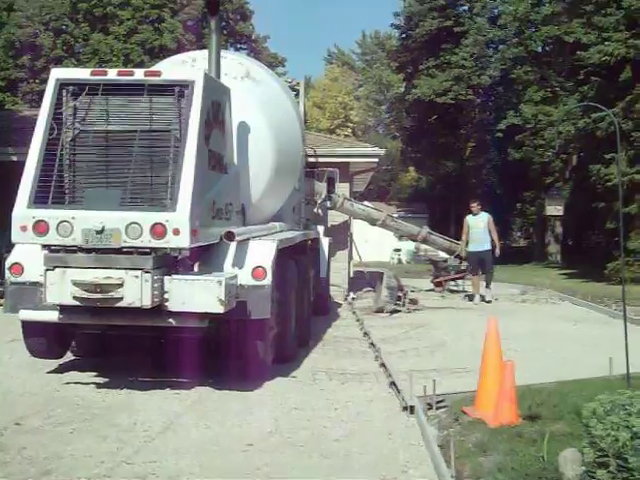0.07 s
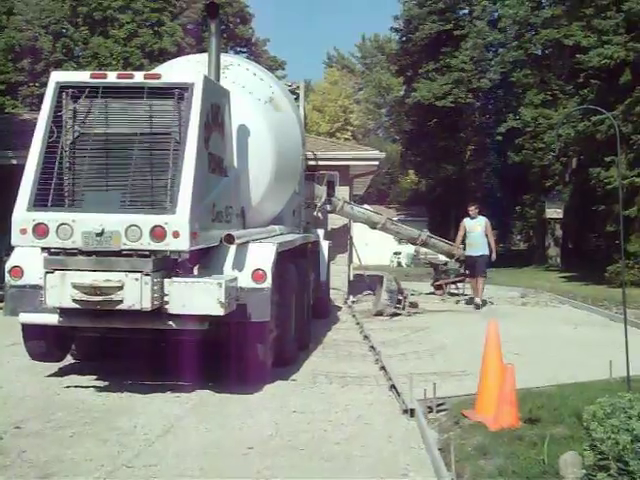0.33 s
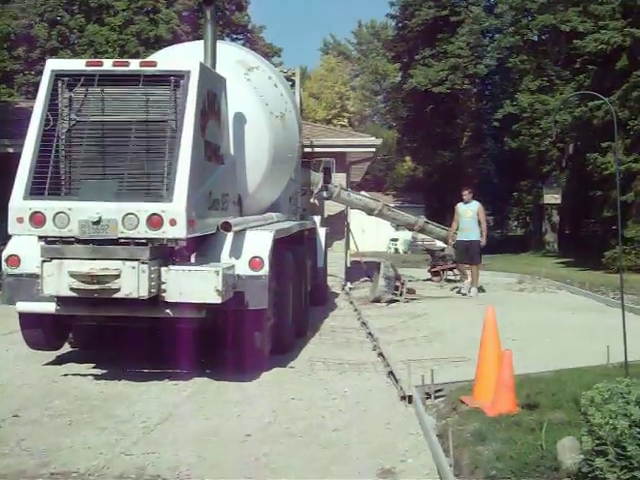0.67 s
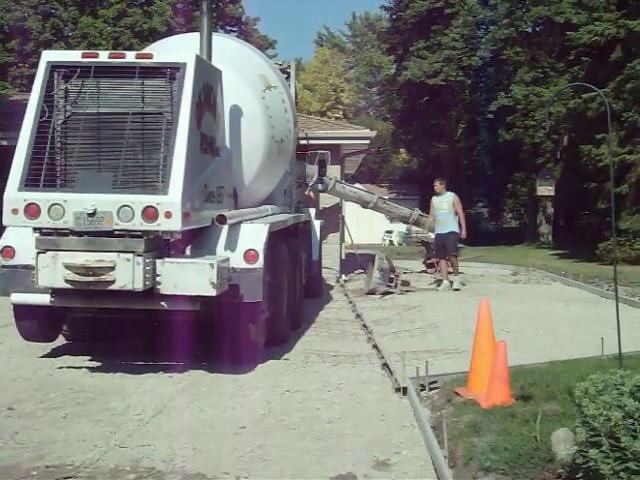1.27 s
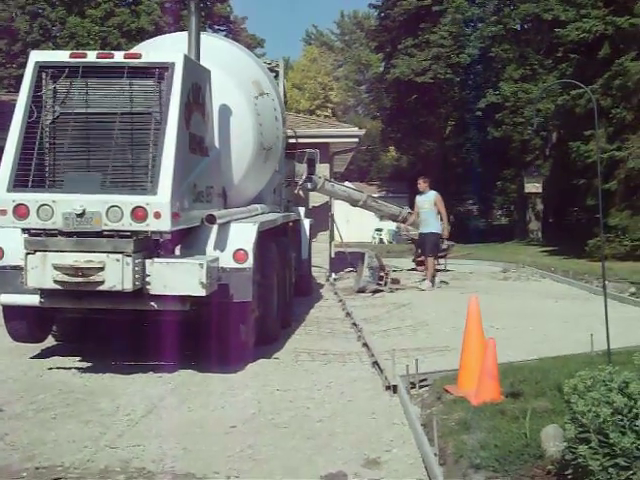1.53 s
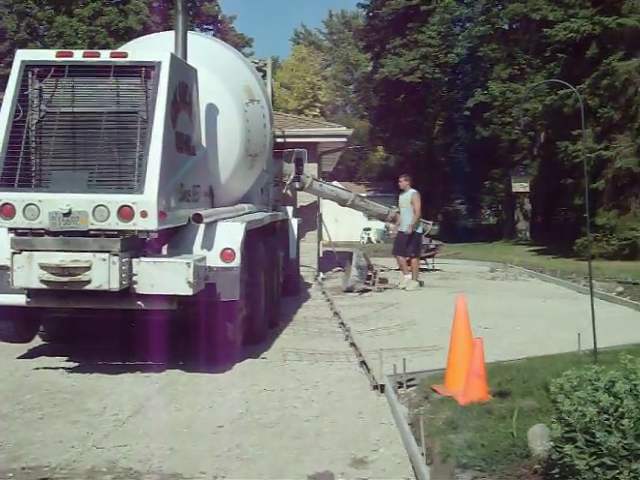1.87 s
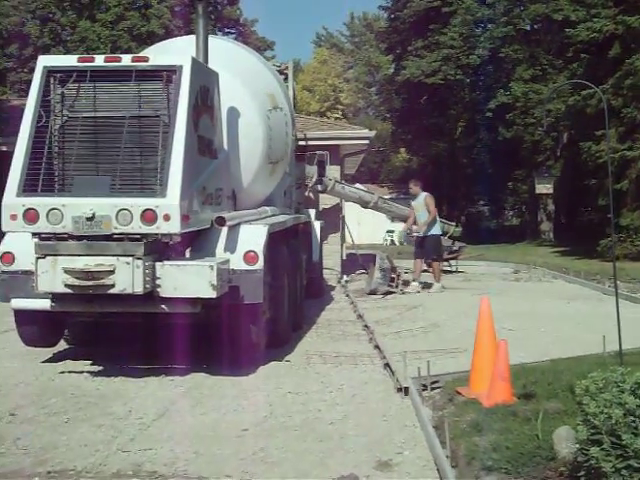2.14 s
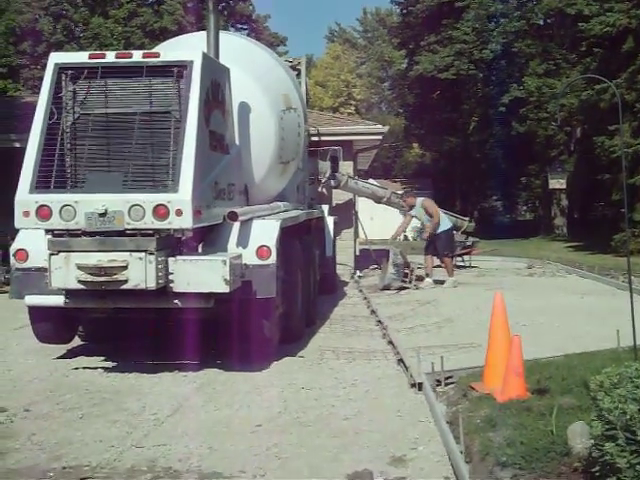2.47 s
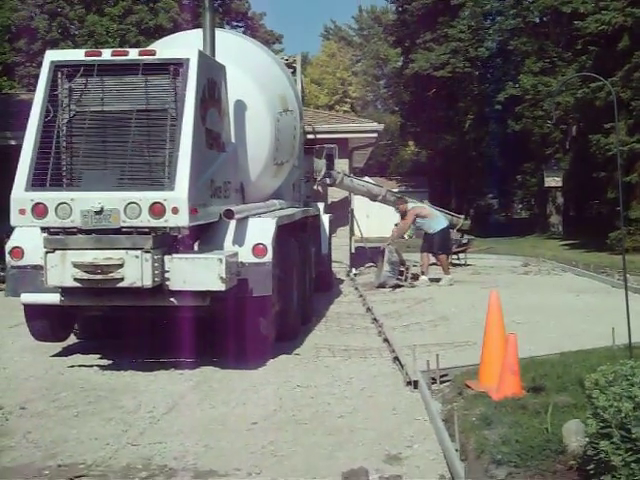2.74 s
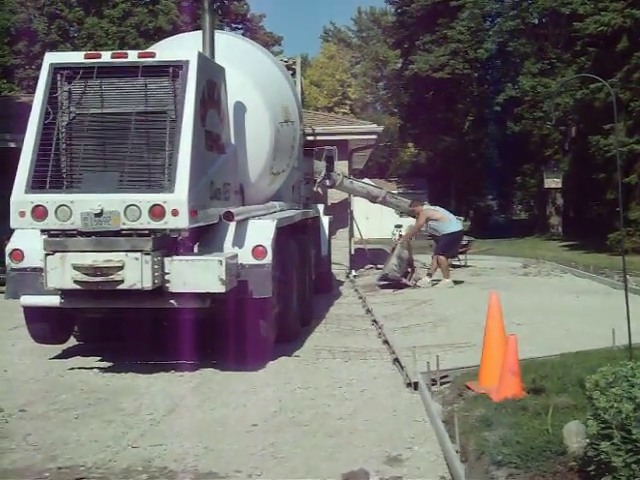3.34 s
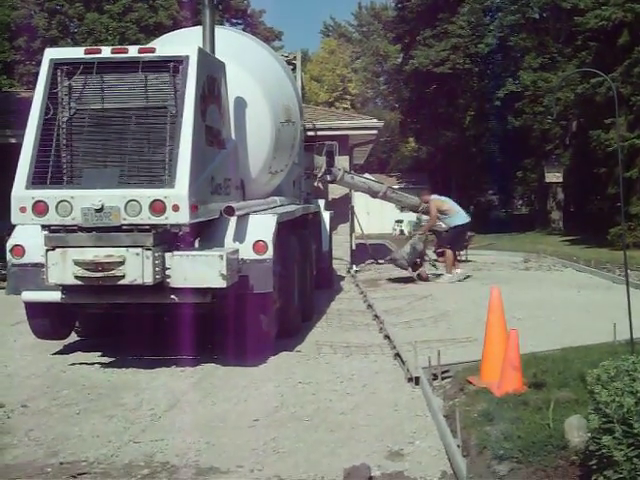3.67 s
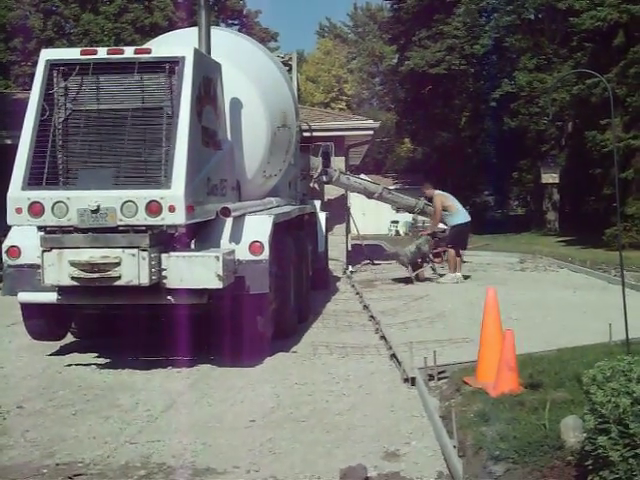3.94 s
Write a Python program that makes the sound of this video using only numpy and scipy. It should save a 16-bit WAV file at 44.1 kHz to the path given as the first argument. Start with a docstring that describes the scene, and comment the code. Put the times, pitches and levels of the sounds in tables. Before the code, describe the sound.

A concrete mixer truck's diesel engine starts at a high rev with a fan roar and raspy hiss, then slows steadily. A thin, fluttering whistle rises in pitch, strongest from about 1.7 to 2.9 seconds, then faint. The hiss fades as the firings separate. From about 3 seconds to the end at 4, the engine idles with hard knocking, ticking and exhaust thumps. Gears and drum grind underneath throughout.

```python
"""A concrete mixer truck's six-cylinder diesel runs down from a high rev into a knocking idle.
Each firing thumps the exhaust and rings the block, with injectors and valves ticking just ahead.
Behind it the gears and drum grind, the fan's roar eases and the turbocharger spins down.
Coarse sampling folds the turbo's falling whistle over, so it is heard rising for about three seconds."""
import sys
import numpy as np
from scipy import signal
from scipy.fft import rfft, irfft, next_fast_len
from scipy.io import wavfile
from scipy.ndimage import map_coordinates

SR = 44100
rng = np.random.default_rng(int(sys.argv[2]) if len(sys.argv) > 2 else 0)


def pcm_store(signal):
    """Save signal as 16-bit PCM."""
    levels = np.round(np.clip(np.atleast_2d(signal), -1, 1) * 32767)
    wavfile.write(sys.argv[1], SR, levels.astype(np.int16).T)


N = 176400


def amp(db):
    """Decibels to gain."""
    return 10 ** (np.asarray(db) / 20)


def unit(x):
    """Scale to rms 1."""
    return x / np.sqrt(np.mean(x ** 2) + 1e-20)


def curves(rows):
    """One automation curve for each column after the time."""
    seconds, *columns = np.transpose(rows)
    return [np.interp(np.arange(N) / SR, seconds, column) for column in columns]


def wobble(rate):
    """A smooth random curve, rate knots a second."""
    return map_coordinates(rng.standard_normal(2000), [np.arange(N) * rate / SR + 2], mode="wrap")


def filtered(x, response):
    """Apply a complex frequency response."""
    size = next_fast_len(N + SR // 2)
    return irfft(rfft(x, size) * response(np.fft.rfftfreq(size, 1 / SR)), size)[:N]


def equalised(x, eq):
    """Apply an EQ drawn through (Hz, dB) points on a log axis."""
    hz, db = np.transpose(eq)
    return filtered(x, lambda f: amp(np.interp(np.log(f + 1), np.log(hz + 1), db)))


def noise(eq):
    """Noise at rms 1, coloured by an EQ."""
    return unit(equalised(rng.standard_normal(N), eq))


def ringing(x, modes):
    """Ring a bank of resonances of alternating polarity."""
    return filtered(x, lambda f: sum(
        (-1) ** k * amp(db) * 1j * f * width / (hz * hz - f * f + 1j * f * width)
        for k, (hz, width, db) in enumerate(modes)))


def bursts(pulses, attack_s, decay_s):
    """A short swell and decay after every pulse."""
    t = np.arange(SR // 8) / SR
    envelope = (1 - np.exp(-t / attack_s)) * np.exp(-t / decay_s)
    return signal.fftconvolve(pulses, envelope)[:N]


# Sub-bass of the chassis. Each row: frequency in Hz, gain in dB.
RUMBLE_EQ = [(5, -0.5), (15, -2), (28, -1), (45, -14), (90, -38.5)]

def chassis_rumble():
    """The chassis shudders, faint and deep."""
    return amp(-46.5) * noise(RUMBLE_EQ)


# Tone of the air bed and of the fan's roar. Each row: frequency in Hz, gain in dB.
AIR_EQ = [(15, -11), (40, 3.5), (150, 4.5), (350, 4.5), (1000, -0.5), (1400, 2), (2100, -11.5),
          (3200, -5.5), (4200, -2.5), (5100, -0.5), (6000, -29), (8000, -33)]
ROAR_EQ = [(20, -29), (60, -20), (130, -5.5), (260, -6), (400, 1), (500, -3), (575, -6.5), (680, 4.5),
           (980, 0.5), (1130, -1.5), (1260, -14.5), (1450, -19), (1800, -11.5), (2100, -20), (2500, -11.5),
           (3100, -15), (3800, -18.5), (5000, -20.5), (6000, -27.5), (8000, -45.5)]
# Fader for the roar. Each row: time in seconds, level in dB.
ROAR_LEVEL = [(0, -9), (.2, -14.5), (.7, -14), (.85, -18), (1.3, -19), (1.7, -23), (2.2, -20.5), (2.7, -22),
              (3.1, -15), (3.5, -18), (4, -16)]

def fan_roar():
    """Turbulent air from the fan and intake, over a steady rush."""
    level_db, = curves(ROAR_LEVEL)
    roar = amp(level_db + 0.77 * wobble(24.99) + 0.88 * wobble(130)) * noise(ROAR_EQ)
    rush = amp(-27.5 + 1.1 * wobble(20)) * noise(AIR_EQ)
    return roar + rush


# Tone of the blade rasp. Each row: frequency in Hz, gain in dB.
RASP_EQ = [(900, -35.5), (1550, -13), (1900, -3), (2500, 3), (3000, 2.5), (3500, -2.5), (4200, -10),
           (5000, -10), (6000, -12), (8000, -39.5)]
# Fader for the rasp. Each row: time in seconds, level in dB.
RASP_LEVEL = [(0, -24.5), (.7, -24), (1.3, -23), (1.8, -27), (2.3, -25.5), (2.8, -35), (4, -42.5)]

def fan_rasp():
    """Coarse hiss from the fan blades, faded down towards idle."""
    level_db, = curves(RASP_LEVEL)
    grain_db = .8 * wobble(20) + 1.2 * wobble(260)
    return amp(level_db + grain_db) * noise(RASP_EQ)


# Ring of the housings. Each row: pitch in Hz, bandwidth in Hz, gain in dB.
HOUSING_MODES = [(348.1, 9.7, -2.5), (412.6, 41, -13), (505.3, 21.6, 2.5), (673, 55, -10), (780, 53, -4),
                 (928.5, 60, -1.5), (1715, 112, -13.5), (2435, 176, -14)]
# Fader for the grind. Each row: time in seconds, level in dB.
GRIND_LEVEL = [(0, -24.5), (.5, -17.5), (1.25, -19.5), (1.45, -19), (1.9, -18.5), (2.25, -16.5), (2.7, -21),
               (3.05, -17.5), (3.5, -20), (4, -19.5)]

def gear_grind():
    """Gears and the turning drum grind unevenly into the housings."""
    level_db, = curves(GRIND_LEVEL)
    return amp(level_db + 1.2 * wobble(14)) * unit(ringing(rng.standard_normal(N), HOUSING_MODES))


# Glide of the blade tone. Each row: time in seconds, pitch in Hz before folding, level in dB.
TURBO_GLIDE = [(0, 10900, -45), (1.3, 9150, -39), (1.7, 8190, -39), (1.745, 8070, -27.5), (1.88, 7640, -27),
               (2.11, 7120, -30), (2.2, 6930, -40), (2.3, 6725, -26), (2.41, 6560, -31),
               (2.49, 6345, -22.5), (2.63, 6053, -24), (2.73, 5935, -20.5), (2.86, 5730, -22),
               (2.9, 5650, -40), (3.08, 5524, -33.5), (3.3, 5290, -43.5), (3.6, 5040, -34), (4, 4790, -37)]
# Fader for the turbo's lower tone. Each row: time in seconds, level in dB.
UNDERTONE_LEVEL = [(0, -59), (1.25, -35.5), (1.55, -40), (1.76, -31.5), (2.05, -36), (2.4, -46), (3, -63)]

def turbo_whistle(undertone_ratio=.82, flutter_hz=24, flutter_db=2.3):
    """The turbocharger spins down; its two tones flutter in the moving air."""
    blade_hz, blade_db = curves(TURBO_GLIDE)
    under_db, = curves(UNDERTONE_LEVEL)
    phase = 2 * np.pi * np.cumsum(blade_hz + flutter_hz * wobble(120)) / SR
    blade = amp(blade_db + flutter_db * wobble(60)) * np.sin(phase)
    under_gain = amp(under_db + flutter_db * wobble(20))
    return blade + under_gain * np.sin(undertone_ratio * phase + 1.2 * wobble(180))


# The engine's run-down. Each row: time in seconds, firings per second.
FIRING_RATE = [(0, 88), (.2, 84), (.55, 71.5), (.9, 63), (1.3, 53.5), (1.6, 48), (2, 41.3), (2.3, 36.5),
               (2.6, 32), (2.8, 29.3), (3.1, 28.4), (3.35, 27.9), (3.6, 28.1), (4, 28.6)]
# The engine's lope. Each entry: one cylinder's accent in dB.
CYLINDER_DB = [1, -.5, .5, -1, .7, 0]

def firings(scatter_db, lead_s=0, jitter_s=.0003):
    """One impulse per firing, sized by its cylinder and by chance."""
    rate, = curves(FIRING_RATE)
    count = np.cumsum(rate) / SR
    count -= np.interp(3.533 - lead_s, np.arange(N) / SR, count)  # pin the beat to one idle firing
    onsets = np.flatnonzero(np.diff(np.floor(count)))
    cylinder = np.round(count[onsets]).astype(int) % len(CYLINDER_DB)
    strength, lateness = rng.standard_normal((SR, 2))[:len(onsets)].T
    onsets = np.clip(onsets + np.round(jitter_s * SR * lateness).astype(int), 0, N - 1)
    return np.bincount(onsets, amp(np.take(CYLINDER_DB, cylinder) + scatter_db * strength), N)


def levelled_firings(scatter_db, idle_hz=28.2):
    """Firings trimmed so that a fast run carries the same power as idle."""
    rate, = curves(FIRING_RATE)
    return firings(scatter_db) * np.sqrt(idle_hz / rate)


# Bright tone of the ticks. Each row: frequency in Hz, gain in dB.
CLATTER_EQ = [(300, -25), (1300, -13), (1800, -6.5), (2100, -2), (2600, 2), (4000, -1), (5200, -2.5),
              (8000, -28)]

def valve_clatter():
    """Injectors and valves tick just ahead of each firing."""
    ticks = bursts(firings(scatter_db=1.3, lead_s=.0053), attack_s=.00084, decay_s=.0083)
    return amp(-31.5) * unit(ticks * noise(CLATTER_EQ))


# Dark tone of the pipe. Each row: frequency in Hz, gain in dB.
EXHAUST_EQ = [(15, -18.5), (30, -10.5), (55, -3.5), (85, 0.5), (115, -5.5), (170, -1), (225, -5.5),
              (280, -6), (400, 4.5), (600, -6.5), (1200, -46), (4000, -75)]
# Fader for the thump. Each row: time in seconds, level in dB.
EXHAUST_LEVEL = [(0, -30.5), (.5, -31), (1, -26), (1.6, -32.5), (2.4, -26.5), (2.8, -29.5), (3.2, -26),
                 (4, -31.5)]

def exhaust_thump(smear_s=.0046):
    """The pipe smears the firing pulses into low harmonics."""
    t = np.arange(SR // 10) / SR
    smear = rng.standard_normal(len(t)) * np.exp(-t / smear_s)
    smear_phase = np.angle(rfft(smear, 2 * len(t)))
    pipe = irfft(np.exp(1j * smear_phase))[:len(t)]  # phase only: the EQ sets the tone
    puffs = signal.fftconvolve(levelled_firings(scatter_db=.6), pipe)[:N]
    level_db, = curves(EXHAUST_LEVEL)
    return amp(level_db) * unit(equalised(puffs, EXHAUST_EQ))


# The block's rattle and its main ring. Each row: pitch in Hz, bandwidth in Hz, gain in dB.
RATTLE_MODES = [(676, 57, -9), (854, 47, -4.5), (966, 48, -1), (1096, 90, -5.5), (1727, 150, -13),
                (2460, 130, -18), (3270, 120, -22), (4860, 190, -26)]
BLOW_MODE = [(931, 85, 0)]
# Faders for the rattle and the blow, which hardens as the fuel returns at idle.
# Each row: time in seconds, level in dB.
RATTLE_LEVEL = [(0, -29.5), (.7, -31.5), (1.4, -23.5), (2.1, -19), (2.7, -22.5), (3.05, -19.5), (3.5, -17),
                (4, -19.5)]
BLOW_LEVEL = [(0, -22), (1.4, -33), (2.2, -35.5), (2.8, -23.5), (3.1, -19.5), (3.5, -17.5), (4, -17.5)]

def diesel_knock():
    """Each combustion blow rings the block's main mode and sets off a brief rattle."""
    rattle_db, = curves(RATTLE_LEVEL)
    blow_db, = curves(BLOW_LEVEL)
    pulses = levelled_firings(scatter_db=.7)
    shake = bursts(pulses, attack_s=.0014, decay_s=.013) * rng.standard_normal(N)
    rattle = ringing(shake, RATTLE_MODES)
    blow = pulses
    for _ in range(3):  # repeated passes round off the attack
        blow = ringing(blow, BLOW_MODE)
    return amp(rattle_db) * unit(rattle) + amp(blow_db) * unit(blow)


def scene():
    """The whole truck in mono."""
    engine = exhaust_thump() + diesel_knock() + valve_clatter()
    return (engine + gear_grind() + fan_roar() + fan_rasp() + turbo_whistle() + chassis_rumble())[None]


# Treble roll-off on the mix. Each row: frequency in Hz, gain in dB.
MASTER_EQ = [(10, 0), (4900, 0.5), (5300, -3.5), (5512, -5), (5750, -12), (6000, -24), (6300, -43.5)]

def record(dry):
    """Soft clipping rounds the peaks; keeping every fourth sample folds tones above 5.5 kHz down."""
    ceiling, step, silence_s, cutoff_hz = .78, 4, .036, 6400
    rounded = dry[0] / (1 + np.abs(dry[0] / ceiling) ** 6) ** (1 / 6)
    n = np.arange(N)
    folded = rounded * step * (n % step == 0)
    gated = folded * (n > silence_s * SR)
    return filtered(equalised(gated, MASTER_EQ), lambda hz: hz < cutoff_hz)[None]


dry = scene()
out = record(dry)
pcm_store(out)
```